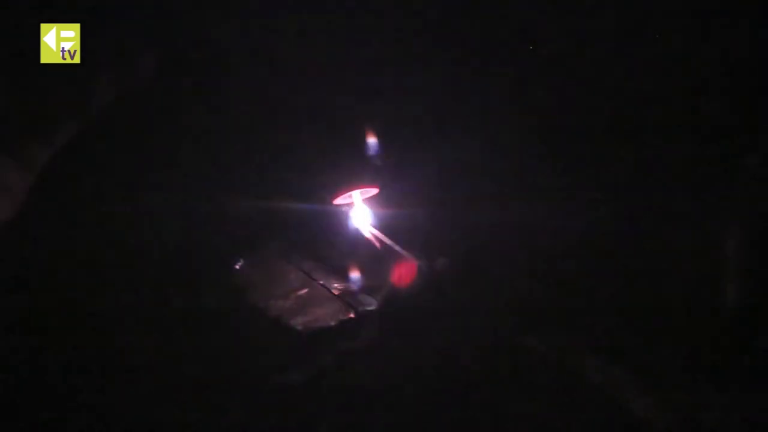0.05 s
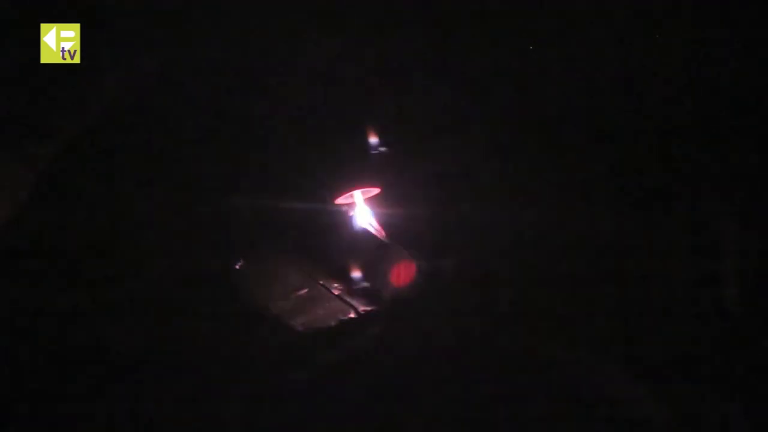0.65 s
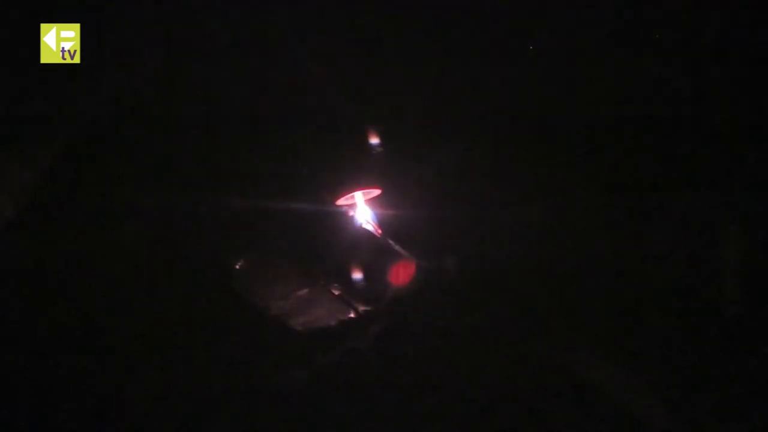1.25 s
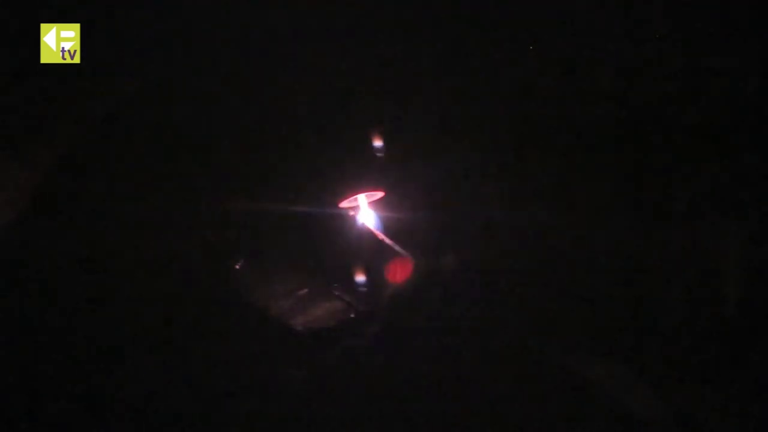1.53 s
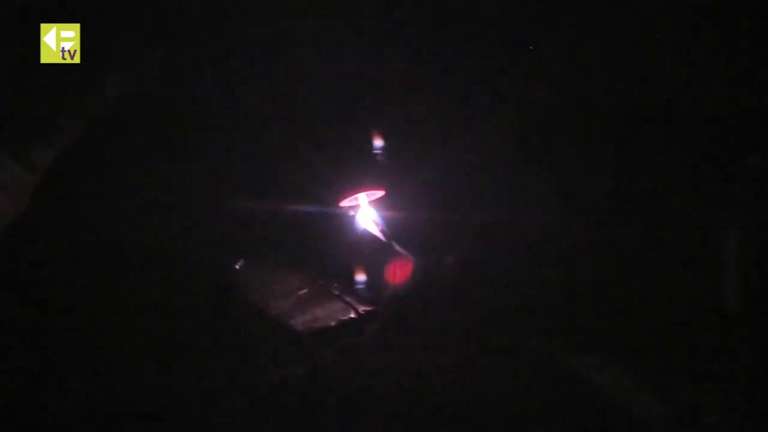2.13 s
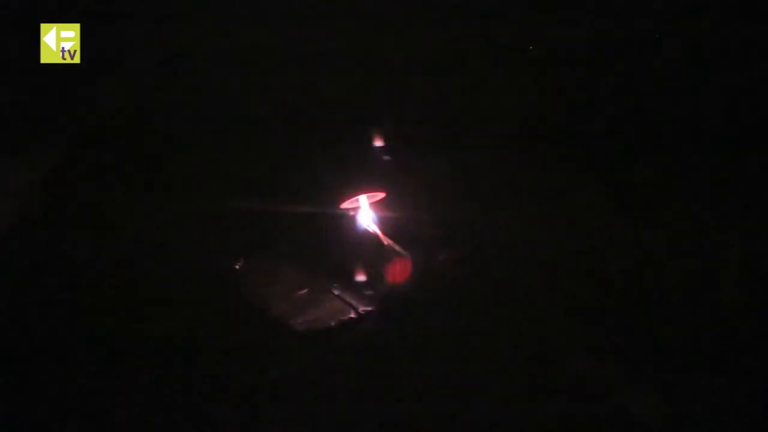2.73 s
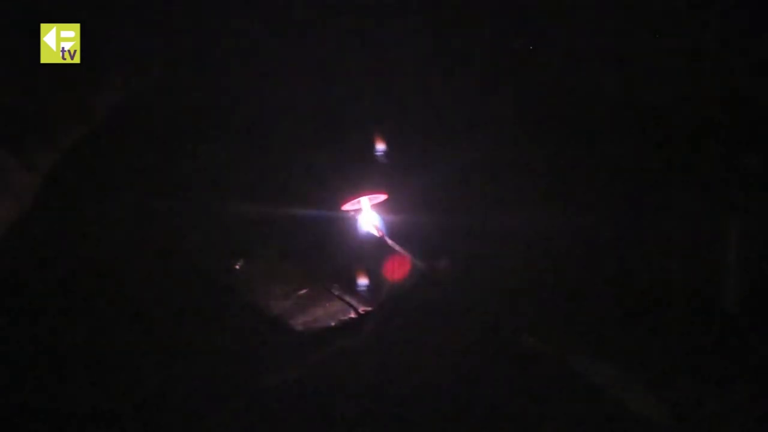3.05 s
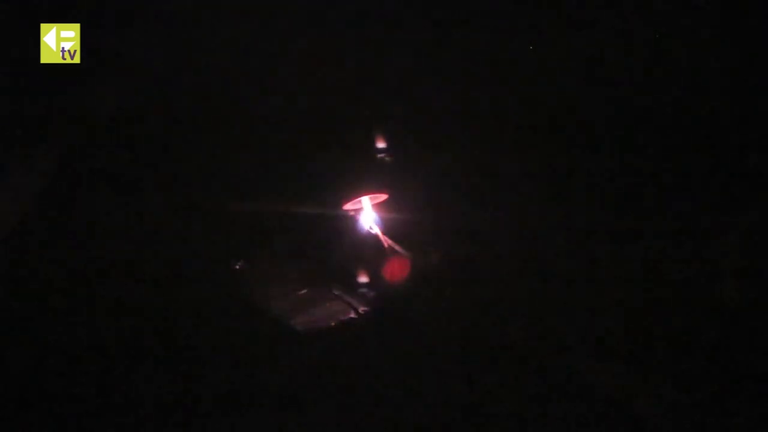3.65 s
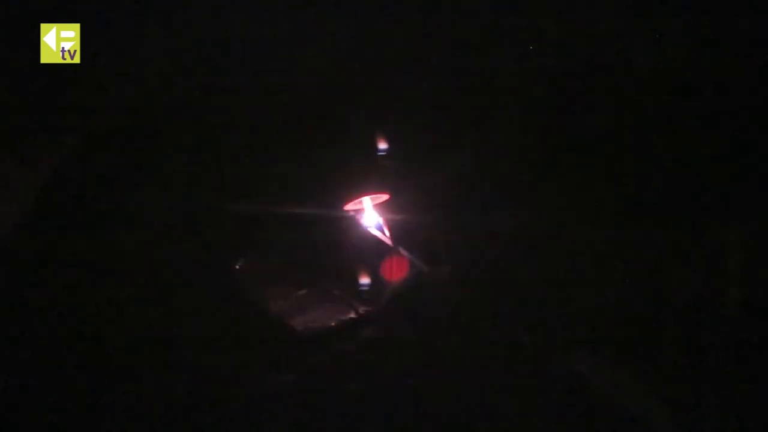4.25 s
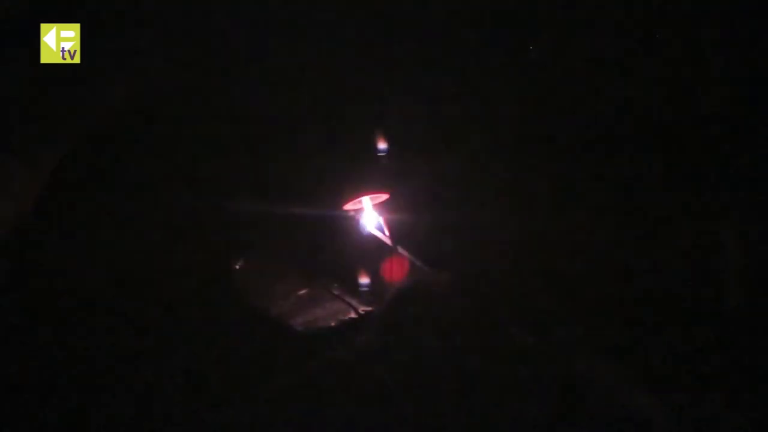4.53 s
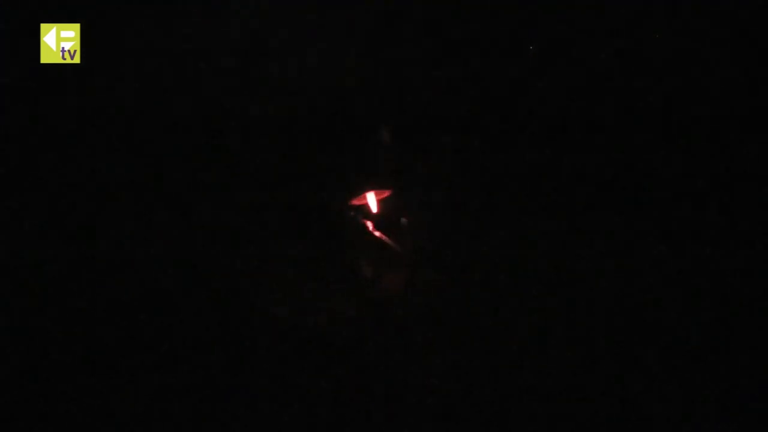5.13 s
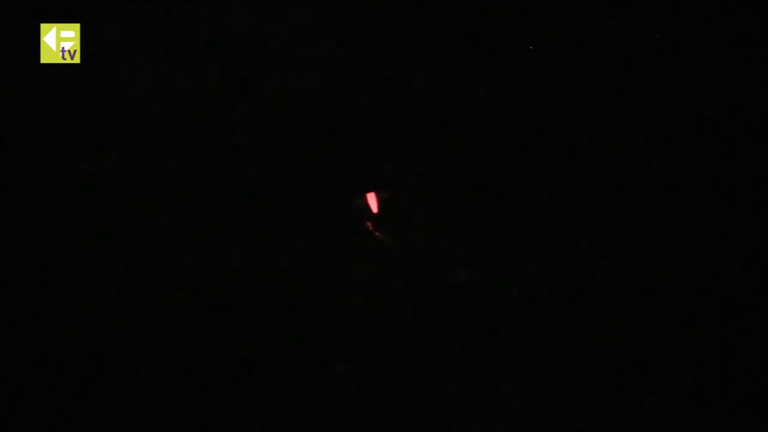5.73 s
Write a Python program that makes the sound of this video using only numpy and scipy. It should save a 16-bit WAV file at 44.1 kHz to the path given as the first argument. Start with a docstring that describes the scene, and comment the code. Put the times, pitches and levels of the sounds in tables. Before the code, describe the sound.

From the very start, an electric welding arc buzzes close up in a workshop. The buzz is bright, raspy and steady, made of about a hundred tiny snaps a second, with short reflections from the bench and room. The current pulses a little over four times a second, each pulse marked by a pair of dull ticks and a slight shift in tone. The level wavers a little. A few harder snaps stand out around 1 second and 2.3 to 2.5 seconds, then come more often between 3.8 and 4.5 seconds. At about 4.9 seconds the arc cuts off suddenly. The welder's cooling fan, until then buried beneath the buzz, swells gradually through the last second, an even rush of air with a faint, slightly wavering motor whine.

```python
"""A pulsed AC TIG welding arc, heard up close in a workshop.
The arc snaps twice per cycle as the current reverses; each snap stirs the gas into a brief rasp.
A pulser steps the current up and down, which ticks and shifts the timbre.
Torch, bench and room reflect the arc. When it stops, gain control lets the cooling fan swell."""
import sys
import numpy as np
from scipy import signal
from scipy.fft import rfft, irfft
from scipy.io import wavfile
from scipy.ndimage import uniform_filter1d, map_coordinates

SR = 44100
rng = np.random.default_rng(int(sys.argv[2]) if len(sys.argv) > 2 else 0)


def master_out(mix):
    """Clip the mix to full scale and print it as 16-bit PCM to the path in sys.argv[1]."""
    frames = np.transpose(np.atleast_2d(mix))
    ceiling = np.clip(frames, -1, 1)
    pcm = np.round(ceiling * 32767).astype(np.int16)
    wavfile.write(sys.argv[1], SR, pcm)


N = 259749

AC_HZ, FIRST_STRIKE_S, CLEANING_S = 49.2153, .0193, .00507  # cleaning: from strike to return snap
FIRST_RISE_S, PULSE_PERIOD_S, HIGH_CURRENT_S = .0595, .23122, .074
ARC_OFF_S = 4.93

# snap strength as the arc length wanders (time [s], level [dB])
ARC_WANDER = [(0.02, 3.5), (0.12, 0), (0.85, 1.8), (0.95, -2.5), (1.06, 2), (1.22, -3.5), (1.32, 1),
              (1.48, -3.5), (1.52, -1.5), (1.93, 1.3), (2.05, -2.5), (2.19, -1.3), (2.62, -2), (2.72, 1.9),
              (3.05, -1.4), (3.17, -1.5), (3.76, 0.2), (4.0, -4), (4.06, 1), (4.21, -2.9), (4.53, -1.2),
              (4.67, -1.5), (4.72, 2), (4.9, -0.5)]
# snap body, the part that grows with the jump in current (frequency [Hz], share [0-1])
SNAP_BODY = [(1700, 0), (2400, .8), (3100, 1), (4500, .85), (6500, .45), (9500, 0)]


def amp(db):
    return 10 ** (np.asarray(db) / 20)


def at_hz(points, hz):
    """Interpolate a spectrum over log frequency."""
    points_hz, value = np.transpose(points)
    return np.interp(np.log(hz + 1), np.log(points_hz + 1), value)


def at_time(points, times_s):
    """Interpolate a curve over time."""
    return np.interp(times_s, *np.transpose(points))


def beats(first_s, rate_hz=AC_HZ, slows_at_s=2.03, slowing=.00081):
    """Beat times [s] of the welder's clock while the arc burns; the rhythm eases a hair."""
    times_s = first_s + np.arange(-1, ARC_OFF_S * rate_hz) / rate_hz
    times_s += slowing * np.maximum(times_s - slows_at_s, 0)
    return times_s[(times_s > 0) & (times_s < ARC_OFF_S)]


def since_drop_s(times_s):
    """Time since the pulser dropped the current; 0 while it is high."""
    rises_s = beats(FIRST_RISE_S, 1 / PULSE_PERIOD_S)
    last_rise_s = np.r_[FIRST_RISE_S - PULSE_PERIOD_S, rises_s][np.searchsorted(rises_s, times_s)]
    return np.maximum(times_s - last_rise_s - HIGH_CURRENT_S, 0)


def torch_travel():
    """Position along the seam, 0-1."""
    return np.minimum(np.arange(N) / SR / ARC_OFF_S, 1)


def clicks(times_s, colour_db, smear_s=0.00014, size=2048):
    """One click per time and spectrum; its body lags its bright edge by up to smear_s."""
    cepstrum = irfft(np.log(amp(np.maximum(colour_db, -90))), axis=1)
    cepstrum[:, 1:size // 2] *= 2  # fold to minimum phase
    cepstrum[:, size // 2 + 1:] = 0
    starts, fraction = np.divmod(times_s * SR, 1)
    lead = size // 8  # room for the rising flank
    lag = lead + fraction[:, None] + smear_s * SR * at_hz(SNAP_BODY, np.fft.rfftfreq(size, 1 / SR))
    phase = 2j * np.pi * (np.cumsum(lag, axis=1) - lag) / size
    waves = irfft(np.exp(rfft(cepstrum, axis=1) - phase), axis=1)
    out = np.zeros(N + size)
    for start, wave in zip(starts.astype(int), waves):
        out[start:start + size] += wave
    return out[lead:lead + N]


def cooling_fan(air_db=-31.5, waver_hz=0.827, size=8192):
    """Air rushes through the welder's case over the motor's slightly wavering tones."""
    # air rush (frequency [Hz], relative density [dB])
    rush = [(25, -20), (55, -18.5), (80, -7), (150, -6.5), (220, -2), (400, -4), (700, -5), (1120, -2.5),
            (1700, -10.5), (2500, -11.5), (3600, -12), (6000, -18), (9000, -23), (13000, -27), (15500, -37)]
    # case resonances (frequency [Hz], width [Hz], boost [dB])
    case_modes = [(322.6, 37, 9), (536, 61, 10), (766, 74, 7), (1610, 17, 0.5), (2114, 29, 10.5)]
    # motor hum and whine (frequency [Hz], level [dB])
    motor_tones = [(80, -59), (721, -44.5), (959, -51.5), (1439, -46), (1599, -51), (2159, -47.5),
                   (3531, -57)]
    hz, t = np.fft.rfftfreq(N, 1 / SR), np.arange(N) / SR
    case_db = sum(db / (1 + ((hz - mode_hz) / width_hz) ** 4) for mode_hz, width_hz, db in case_modes)
    air = irfft(rfft(rng.standard_normal(N)) * amp(at_hz(rush, hz) + case_db), N)
    out = amp(air_db) * air / air.std()
    for tone_hz, db in motor_tones:
        drift_hz = waver_hz * np.sqrt(size) * uniform_filter1d(rng.standard_normal(N), size, mode="wrap")
        out += np.sqrt(2) * amp(db) * np.sin(2 * np.pi * (tone_hz * t + np.cumsum(drift_hz) / SR))
    return out


def snaps(times_s, level_db, lean, body_db, scatter_db, body_scatter_db, base_db=12.5, jitter_s=5e-6):
    """The arc collapses and swells again at each reversal; strength and fullness scatter."""
    # snap spectrum (frequency [Hz], level [dB])
    spectrum = [(50, -52), (300, -29.5), (1850, -20), (2150, -0.5), (3000, 0.5), (4900, -1), (5450, -7),
                (5950, -2.5), (8400, -8), (9400, 3.5), (11500, 1), (14000, 5), (15000, -5), (15700, -7.5)]
    # lower-edge cut of a strike on low current (frequency [Hz], gain [dB])
    lean_cut = [(1500, -2), (2200, -6), (3000, 0)]
    hz = np.fft.rfftfreq(2048, 1 / SR)
    loud, full, late = rng.standard_normal((len(times_s), 3)).T
    strength_db = base_db + level_db + scatter_db * loud
    colour_db = at_hz(spectrum, hz) + np.outer(lean, at_hz(lean_cut, hz))
    colour_db = colour_db + np.outer(body_db + body_scatter_db * full, at_hz(SNAP_BODY, hz))
    return clicks(times_s + jitter_s * late, colour_db + strength_db[:, None])


def return_snaps(offset_db=0.15, cool_body_db=2.5, hot_body_db=8, cooling_s=0.012):
    """The current turns back with a steady snap, fuller while the arc is hot."""
    times_s = beats(FIRST_STRIKE_S + CLEANING_S)
    heat = np.exp(-since_drop_s(times_s) / cooling_s)
    body_db = cool_body_db + (hot_body_db - cool_body_db) * heat
    level_db = offset_db + at_time(ARC_WANDER, times_s)
    return snaps(times_s, level_db, lean=False, body_db=body_db, scatter_db=0.1, body_scatter_db=0.26)


def strike_snaps(offset_db=1.6, wander_scale=1.4, high_db=-0.86, low_body_db=2.5, high_body_db=-5.5):
    """The arc strikes anew each cycle: now and then hard, but easily and thinly on high current."""
    # single hard strikes (time [s], extra level [dB])
    hard_strikes = [(.934, 3.5), (1.117, 4.5), (1.909, 0.5), (2.255, 3), (2.458, 5.5), (3.719, 0.5),
                    (3.759, 1), (3.841, 6), (3.963, 6), (4.146, 8), (4.186, 5.5), (4.308, 6.5), (4.471, 2),
                    (4.532, 2)]
    times_s = beats(FIRST_STRIKE_S)
    high = since_drop_s(times_s) == 0
    hard_db = np.zeros(len(times_s))
    for at_s, extra_db in hard_strikes:
        hard_db[np.argmin(abs(times_s - at_s))] += extra_db
    body_db = np.where(high, high_body_db, low_body_db) - 0.41 * hard_db  # harder is brighter
    level_db = offset_db + wander_scale * at_time(ARC_WANDER, times_s) + high_db * high + hard_db
    return snaps(times_s, level_db, lean=~high, body_db=body_db, scatter_db=0.7, body_scatter_db=0.16)


def gas_spit(arc, decay_s=0.00091, smooth_bins=600):
    """Each snap stirs the gas into a brief turbulent rasp that takes on the arc's colour."""
    # spit spectrum (frequency [Hz], level against the snap [dB])
    spectrum = [(60, -45), (250, -29.5), (800, 4.5), (2500, -9.5), (4000, -13), (6500, -15.5), (8500, -14),
                (11000, -15), (15000, -17)]
    hold = np.exp(-1 / (decay_s * SR))
    power = signal.lfilter([1 - hold], [1, -hold], arc ** 2)
    rasp = rfft(np.sqrt(power) * rng.standard_normal(N))
    arc_density = abs(uniform_filter1d(abs(rfft(arc)) ** 2, smooth_bins))
    colour = np.sqrt(arc_density / np.mean(abs(rasp) ** 2))
    return irfft(rasp * colour * amp(at_hz(spectrum, np.fft.rfftfreq(N, 1 / SR))), N)


def bench_comb(arc):
    """Direct sound plus near reflections: a comb that drifts as the torch travels."""
    # torch and bench reflections (delay at seam start [ms], delay at seam end [ms], gain [ratio])
    echoes = [(0.513, 0.503, 0.17), (0.636, 0.618, 0.24), (0.679, 0.68, 0.13), (0.779, 0.765, 0.21),
              (1.016, 0.982, 0.12), (1.173, 1.154, 0.1), (1.7, 1.688, 0.11), (2.212, 2.184, 0.11),
              (2.417, 2.43, -0.056), (2.793, 3.1, -0.15)]
    out = arc
    for start_ms, end_ms, gain in echoes:
        delay_ms = start_ms + (end_ms - start_ms) * torch_travel()
        out = out + gain * map_coordinates(arc, [np.arange(N) - delay_ms * SR / 1000], order=3)
    return out


def workshop_reverb(arc, onset_s=0.00085, tails=4, size=16384):
    """Diffuse tails, longest in the bass, crossfade as the torch travels."""
    # reverberation (frequency [Hz], T60 [s], level [dB])
    room = [(200, 0.5, -9), (2870, 0.086, -9.5), (5100, 0.19, -8), (8300, 0.2, -7), (10100, 0.22, -9),
            (15000, 0.1, -5)]
    room = np.array(room)
    fade_in = np.clip(np.arange(size) / SR / onset_s - 1, 0, 1)
    out = np.zeros(N)
    for k in range(tails):
        taps = rng.standard_normal(size) * (rng.random(size) < .15)
        hz, t, frames = signal.stft(taps, SR, nperseg=256)
        t60_s = at_hz(room[:, :2], hz)[:, None]
        tail = signal.istft(frames * amp(-60 * t / t60_s), SR)[1][:size] * fade_in
        share = np.cos(np.pi / 2 * np.clip(torch_travel() * (tails - 1) - k, -1, 1))
        out += signal.oaconvolve(arc * share, tail / np.linalg.norm(tail))[:N]
    level_db = at_hz(room[:, ::2], np.fft.rfftfreq(N, 1 / SR))
    return irfft(rfft(out) * amp(level_db), N)


def pulser_ticks(rise_db=11.8, drop_db=9.3, scatter_db=1, soft_start_db=-7, soft_start_s=0.5):
    """Each current step swells or shrinks the arc column with a dull tick; the first are softer."""
    # tick spectrum (frequency [Hz], level [dB])
    spectrum = [(40, -34), (130, -15), (280, -1), (600, -1.5), (1200, -5.5), (1800, -8), (2300, -1),
                (2900, 1.5), (4300, -3), (6000, -13), (15000, -24)]
    rises_s = beats(FIRST_RISE_S, 1 / PULSE_PERIOD_S)
    drops_s = beats(FIRST_RISE_S + HIGH_CURRENT_S, 1 / PULSE_PERIOD_S)
    times_s = np.r_[rises_s, drops_s]
    level_db = np.repeat([rise_db, drop_db], [len(rises_s), len(drops_s)])
    level_db += soft_start_db * np.maximum(1 - (times_s / soft_start_s) ** 2, 0)
    level_db += scatter_db * rng.standard_normal(len(times_s))
    return clicks(times_s, at_hz(spectrum, np.fft.rfftfreq(2048, 1 / SR)) + level_db[:, None])


def scene():
    """The arc with its reflections, and the fan behind it."""
    arc = strike_snaps() + return_snaps() + pulser_ticks()
    arc += gas_spit(arc)
    return (bench_comb(arc) + workshop_reverb(arc) + cooling_fan())[None]


def record(dry, threshold_db=-30, squeeze=0.85, recovery_db_per_s=14, cutoff_hz=15950, size=2700):
    """Gain control ducks the mix while the arc burns, then slowly recovers; a low-pass follows."""
    power_db = 10 * np.log10(abs(uniform_filter1d(dry[0] ** 2, size)) + 1e-12)
    fall_db = recovery_db_per_s * np.arange(N) / SR
    held_db = np.maximum.accumulate(power_db + fall_db) - fall_db
    over_db = np.maximum(held_db - threshold_db, 0)
    ducked = dry / amp(squeeze * uniform_filter1d(over_db, size))
    lowpass = signal.firwin(511, cutoff_hz, window=("kaiser", 9), fs=SR)
    return signal.oaconvolve(ducked, lowpass[None], "same")


dry = scene()
out = record(dry)
master_out(out)
```